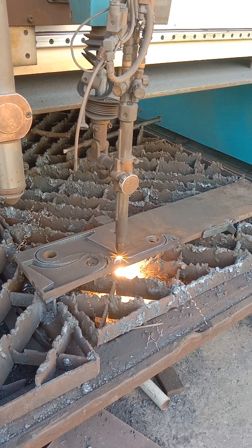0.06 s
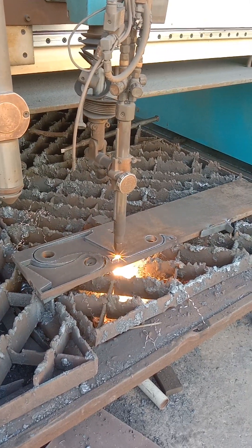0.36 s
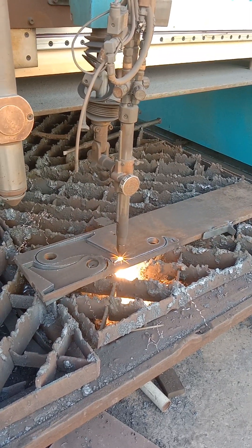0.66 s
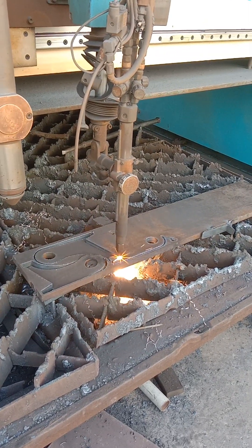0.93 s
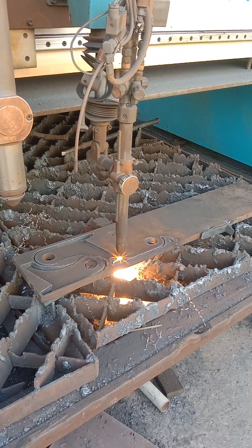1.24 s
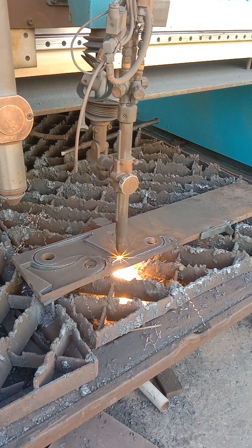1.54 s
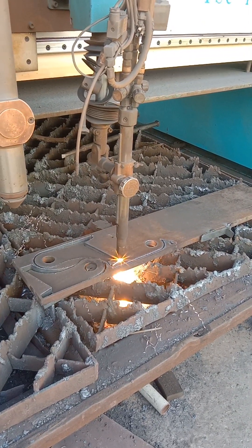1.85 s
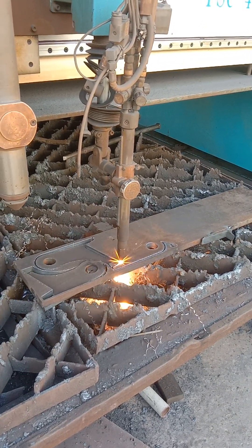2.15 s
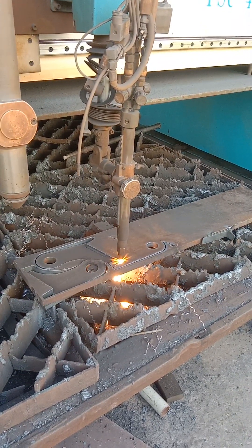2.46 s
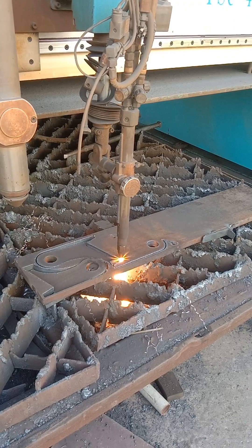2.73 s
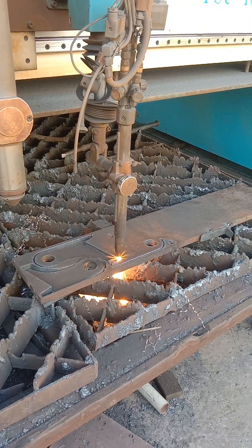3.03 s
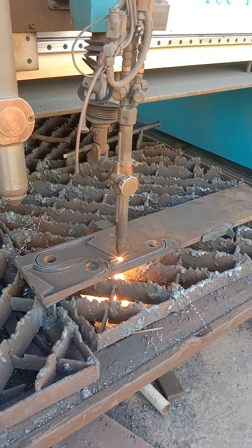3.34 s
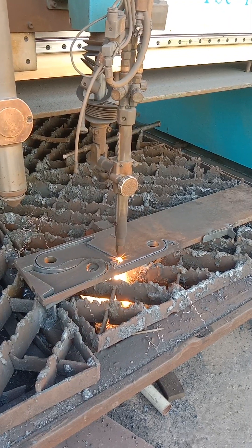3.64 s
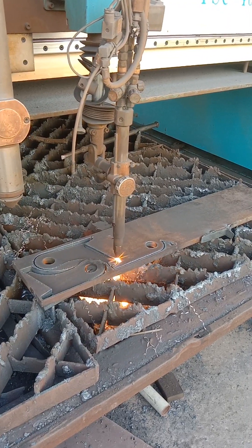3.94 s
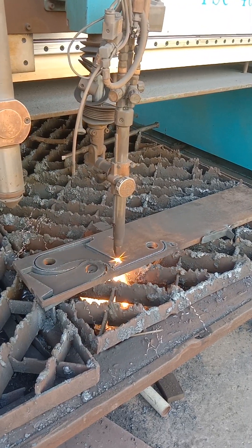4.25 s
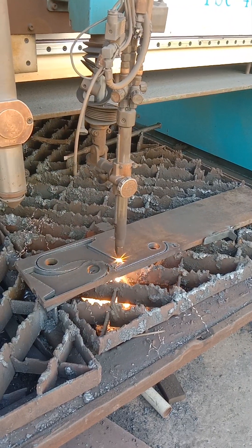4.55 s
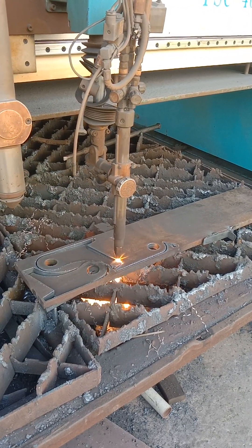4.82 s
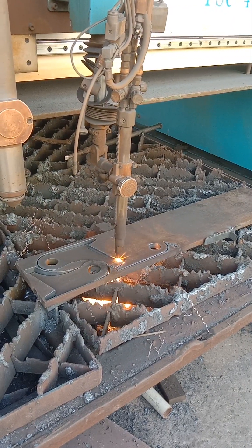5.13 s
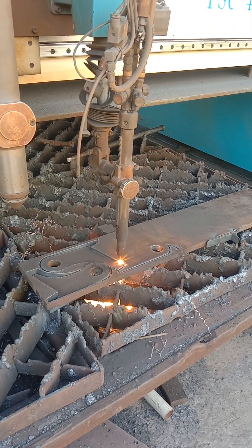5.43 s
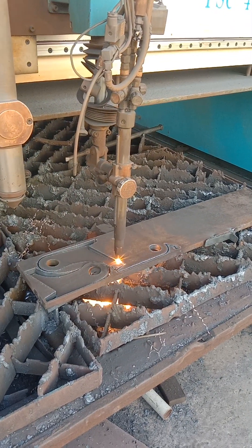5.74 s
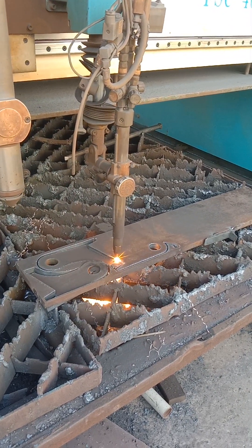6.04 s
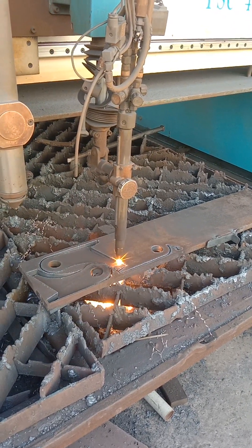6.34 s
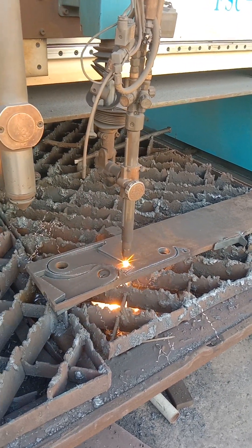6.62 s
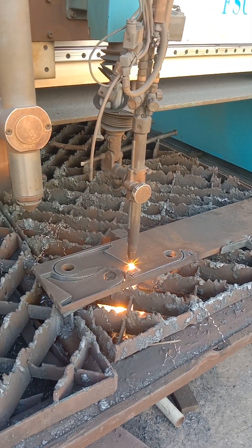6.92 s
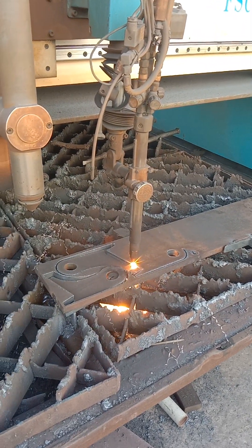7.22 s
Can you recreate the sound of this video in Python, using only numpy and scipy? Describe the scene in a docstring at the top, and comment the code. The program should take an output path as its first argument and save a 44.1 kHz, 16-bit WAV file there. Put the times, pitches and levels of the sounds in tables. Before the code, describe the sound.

A gas cutting torch burns through thick steel plate in a fabrication shop, heard close up and running without a break for about seven seconds. From the start there is a bright, high hiss over an even rush of flames and a rough, finely crackling roar with a breathy whistle. The hiss surges briefly around 2.2 and 2.5 seconds, and the cut rings hollow from about 2.4 to 3.2 seconds. From about 2.9 seconds, molten slag spits in small irregular pops, thickest until 5.5 seconds and scattered afterwards. The whistle shifts in tone near 3 seconds, and a few soft, low puffs of flame come between 3.4 and 4.3 seconds. In the second half the hiss and roar ease slightly while a rapid sputtering flutter grows, with short hiss surges near 6.5 and 7 seconds. A faint gas rumble and a low machine drone lie underneath.

```python
"""An oxy-fuel torch on a cutting machine burns through thick steel plate, heard close by in mono.
Its turbulent oxygen jet hisses at the nozzle, roars in the kerf (the slot being cut) and excites its
resonances, fluttering more and more as slag blocks it and is blown clear in popping gobs.
The preheat flames rush evenly, burning gas rumbles under the plate, and the machine drones.
Standing waves and short echoes of the slatted steel table colour the torch."""
import sys
import numpy as np
from scipy import signal
from scipy.fft import rfft, irfft
from scipy.io import wavfile
from scipy.ndimage import uniform_filter1d

SR = 44100
rng = np.random.default_rng(int(sys.argv[2]) if len(sys.argv) > 2 else 0)


def generate_wav(signal):
    """Clip the signal to [-1, 1] and save it as 16-bit WAV at the path in sys.argv[1]."""
    frames = np.transpose(np.atleast_2d(signal))
    scaled = np.clip(frames, -1, 1) * 32767
    pcm = np.round(scaled).astype(np.int16)
    wavfile.write(sys.argv[1], SR, pcm)


N = 321048
TIME = np.arange(N) / SR
FREQ = np.maximum(np.fft.rfftfreq(N, 1 / SR), .1)

# gobs of slag blown clear, with the relative peaks of their rings: start_s, low_db, middle_db, high_db
SLAG_GOBS = [(2.87, -25, -27.5, -30.5), (2.899, -28, -31.5, -30.5), (3.069, -21, -29.5, -17),
             (3.126, -20.5, -20, -30.0), (3.31, -23, -31.5, -26.5), (3.3715, -23, -33.0, -31.5),
             (3.4348, -22, -31.0, -26.5), (3.6613, -24, -29.5, -25.0), (3.6893, -32, -34.5, -18),
             (3.7781, -30, -35.0, -29.0), (3.8983, -32, -36, -28.0), (3.9576, -26, -30.5, -24),
             (3.99, -34, -28, -23), (4.0894, -23, -34.0, -20), (4.1203, -29, -32, -17),
             (4.2635, -27, -26, -33.5), (4.476, -38, -28.0, -31.0), (4.5129, -32, -29.5, -32),
             (4.5448, -38, -31.5, -20), (4.6007, -26.5, -29.0, -33.5), (4.6496, -25, -36.5, -26),
             (4.772, -33.0, -36.0, -28.5), (4.807, -35.0, -32, -29.0), (4.8935, -36.0, -24, -31),
             (5.0222, -33, -23, -34.0), (5.053, -28, -27, -23), (5.0906, -35.5, -34.5, -25),
             (5.132, -34.0, -35.0, -30.0), (5.1945, -28.5, -32.0, -32.0), (5.35, -31, -26.5, -29.5),
             (5.402, -29, -29.5, -26), (5.4296, -36.0, -32.0, -29.5), (5.7511, -29.5, -32.5, -29.5),
             (6.058, -32, -22, -37.0), (6.1891, -38.0, -30.5, -36.5), (6.617, -40.0, -26.5, -27.5),
             (6.665, -34, -24, -29), (6.7152, -33, -36.0, -35.5), (6.828, -32.0, -30, -25),
             (7.093, -29.5, -28, -31.0), (7.1564, -33.0, -19, -32.5)]


def oxygen_hiss(flutter, early_db=-22.5, late_db=-26.5, waver_db=1.0, shift_db=2.7):
    """Turbulent mixing at the nozzle makes a bright hiss that softens in the corner and surges at times."""
    # spectrum of the free jet: frequency_hz, level_db
    jet_spectrum = [(100, -35), (2000, -10), (4500, -1), (7200, 4.5), (8400, 1), (11500, 0), (14000, 1),
                    (15300, 4.5)]
    # surges of the hiss: start_s, length_s, boost_db
    hiss_surges = [(2.16, 0.19, 3), (2.47, 0.14, 4.5), (4.5, 1.2, 0.4), (6.4, 0.35, 3), (7.02, 0.12, 4.5)]
    # bands that waver independently, shifting the colour: centre_hz
    band_centres = [2000, 6000, 7800, 8800, 9800, 10800, 12000, 13500, 15300]
    level_db = early_db + (late_db - early_db) * step(middle_s=3.5, width_s=0.98)
    level_db = level_db + spells(hiss_surges, attack_s=0.043, release_s=0.041) + waver_db * walk(22)
    spectrum = rfft(colour(rng.standard_normal(N), jet_spectrum))
    shares = np.eye(len(band_centres))
    bands = (irfft(spectrum * np.interp(FREQ, band_centres, share), N) for share in shares)
    shifting = sum(band * undb(shift_db * walk(2.1)) for band in bands)
    return shifting * undb(level_db) * flutter ** 0.065


def jet_levels():
    """Roar and whistle levels in dB: both follow the jet's effort and dip as melt throttles the flow."""
    # how hard the jet works in the kerf: time_s, roar_db, whistle_db
    jet_effort = [(0.1, -22.5, -18), (.5, -23, -20.5), (.97, -22.5, -19), (1.25, -22.5, -21),
                  (1.95, -24.5, -21.5), (2.55, -22.5, -20.5), (2.8, -23.5, -21), (3.45, -23.5, -22),
                  (3.7, -23, -22), (4.1, -27, -23.5), (4.7, -25.5, -26.5), (5.15, -25, -24),
                  (5.9, -27.5, -28), (6.3, -25.5, -26.5), (6.7, -29.5, -27), (7.1, -30, -24.5),
                  (7.28, -26.5, -29)]
    # the melt chokes the kerf: start_s, length_s, depth_db
    melt_chokes = [(2.77, .022, 4), (3.03, .028, 4), (3.342, 0.028, 3), (3.79, 0.022, 3), (4.78, .022, 4),
                   (6.018, 0.026, 6), (6.46, 0.041, 5), (6.565, 0.036, 4)]
    choke_db = spells(melt_chokes, attack_s=0.0039, release_s=.005)
    return [level_db - choke_db for level_db in curves(jet_effort)]


def slag_flutter(clean_db=1.12, clogged_db=4, jitter=0.1166, uneven=.25, lean=0.33, sharp=0.17):
    """Relaxation oscillation: the jet's gain falls as melt gathers and leaps as it bursts through."""
    # the jet clears the slag, labouring in the corner and stalling briefly later: time_s, rate_hz
    clearing_rates = [(0, 41), (2, 48), (3, 30), (3.5, 42), (3.9, 35), (4.3, 42), (4.5, 30), (4.8, 45),
                      (5.03, 54), (5.4, 36), (5.9, 52), (6.03, 17), (6.4, 59), (6.6, 40), (7.28, 52)]
    # the cut runs cleaner and flutters less: start_s, length_s, swing_drop_db
    clean_spells = [(4.17, .27, .9), (6.22, 0.23, 1.5)]
    rate_hz, = curves(clearing_rates)
    swing_db = clean_db + (clogged_db - clean_db) * step(middle_s=3.9, width_s=1.3)
    swing_db = swing_db - spells(clean_spells, attack_s=.025, release_s=.025)
    phase = 2 * np.pi * np.cumsum(rate_hz * np.exp(jitter * walk(27.5))) / SR
    # each gob leaves on a burst of the jet
    burst_s = np.transpose(SLAG_GOBS)[0] + 0.0042
    phase_at_bursts = np.unwrap(np.interp(burst_s, TIME, phase))
    phase = phase - np.interp(TIME, burst_s, phase_at_bursts)
    # bursts are shorter than the lulls, and rise faster than they fall
    cycle = np.cos(phase) + sharp * np.cos(2 * phase) - lean * np.sin(2 * phase)
    gain = undb(swing_db * cycle * (1 + uneven * np.tanh(walk(30))) + 0.57 * walk(24))
    return gain / np.sqrt(uniform_filter1d(gain ** 2, size=8192))  # steady mean power


def kerf_roar(level_db, flutter, crackle_db=-9):
    """Turbulence and bursting droplets radiate broadband noise as the jet tears through the melt."""
    # spectrum of the roar: frequency_hz, level_db
    roar_spectrum = [(60, -51), (300, -24), (700, -25.5), (1100, -1), (1600, -2), (2400, 1), (3300, 1.5),
                     (3900, -1), (5400, -5), (7200, -6), (8200, -13.5), (14000, -45)]
    jet = unit(rng.standard_normal(N) + undb(crackle_db) * pops(per_second=1300, spread_db=22))
    return colour(jet, roar_spectrum) * undb(level_db + 0.72 * walk(16)) * flutter


def kerf_whistle(level_db, flutter, early_db=-1.5, late_db=-3.5):
    """Edge tones: the jet sings on the kerf's edges, whose resonances change as the cut rounds a corner."""
    # resonances before the corner: pitch_hz, width_hz, level_db
    early_modes = [(4770, 270, 1), (5370, 250, 0.5), (5350, 430, -5), (6250, 370, 1.5), (6700, 1400, -4)]
    # resonances after the corner: pitch_hz, width_hz, level_db
    late_modes = [(2310, 300, -2.5), (3310, 600, -4.5), (3800, 180, 0), (4560, 260, 1), (5070, 190, -2.5),
                  (5430, 350, 7.5), (6310, 490, 3.5)]
    turned = step(middle_s=3.2, width_s=0.44)
    early = resonate(early_modes, waver_db=1.77, waver_rate=5.3) * np.sqrt(1 - turned) * undb(early_db)
    late = resonate(late_modes, waver_db=2.5, waver_rate=70) * np.sqrt(turned) * undb(late_db)
    return (early + late) * undb(level_db) * flutter ** 0.77


def kerf_hollow(flutter, low_db=-43, middle_db=-49, upper_db=-45, high_db=-42):
    """Pipe resonance: the slot rings hollow in spells, most on entering the corner."""
    # the slot's notes drift as its shape changes: time_s, low_hz, middle_hz, high_hz
    slot_notes = [(0, 3220, 4680, 7240), (.9, 3350, 4770, 7280), (2.45, 3430, 4680, 7280),
                  (2.9, 3360, 4580, 7310), (3.4, 3390, 4550, 7280), (4.6, 3332, 4630, 7110),
                  (6.5, 3230, 4570, 7170), (7.28, 3194, 4500, 7000)]
    # boosts of its four rings: start_s, length_s, low_db, middle_db, upper_db, high_db
    hollow_spells = [(-.2, .5, 8.5, 8, 4, 4), (.58, .6, 4, 19, 3, 8), (2.36, 0.25, 13.5, 19, 0, 14),
                     (2.61, 0.53, 14.5, 22.5, 4, 11), (3.15, 0.42, 11, 0, 6, 5), (4.72, 0.21, 0, 19, 0, -2),
                     (4.95, 0.23, 8, 7, 6, 8), (6.29, 0.37, 8, 0, 0, 9.5), (6.6, .6, 3.5, -2, 8.5, -3)]
    low_hz, middle_hz, high_hz = curves(slot_notes)
    boost_db = [spells(hollow_spells, attack_s=0.043, release_s=0.064, column=k) for k in range(4)]
    low = ring(low_hz, width_hz=113) * undb(low_db + boost_db[0])
    middle = ring(middle_hz, width_hz=310) * undb(middle_db + boost_db[1])
    upper = ring(5300, width_hz=180) * undb(upper_db + boost_db[2])
    high = ring(high_hz, width_hz=270) * undb(high_db + boost_db[3])
    return (low + middle + upper) * flutter ** 1.16 + high * flutter ** .9


def preheat_flames(start_db=-25.0, swell_db=2):
    """Combustion noise: the ring of flames gives a slowly growing rush with a thin sizzle on top."""
    # spectrum of the flames: frequency_hz, level_db
    flame_spectrum = [(40, -28), (150, -17.5), (280, 0.5), (370, 1.5), (450, -7), (690, -2.5), (1000, 5.5),
                      (1500, 0.5), (2200, -13.5), (4000, -12.5), (7100, -5), (8200, -25), (12000, -16),
                      (14000, -7.5), (15300, -1.5)]
    rush = colour(rng.standard_normal(N), flame_spectrum)
    return rush * undb(start_db + swell_db * TIME / TIME[-1] + .5 * walk(25))


def slag_spits(gain_db=-2.0, body_db=-2):
    """Transient excitation: each gob blown clear gives a hollow pop with its own mix of resonances."""
    # body, low, middle and high ring of a pop: pitch_hz, width_hz
    gob_modes = [(1500, 430), (2270, 360), (3300, 480), (5300, 490)]
    body, low, middle, high = (ring(hz, width_hz) for hz, width_hz in gob_modes)
    rings = [low + undb(body_db) * body, middle, high]
    spits = sum(sound * bursts(SLAG_GOBS, rise_s=.004, column=k) for k, sound in enumerate(rings))
    return spits * undb(gain_db)


def exhaust(rumble_db=-36, waver_db=2.5):
    """Unsteady combustion under the plate rumbles, dies down in lulls and billows in deep puffs."""
    # spectrum of the burning gas: frequency_hz, level_db
    rumble_spectrum = [(20, -45), (50, -16.5), (85, -8.5), (130, 4.5), (160, -4), (210, -12.5), (300, -14),
                       (500, -13.5), (1200, -39)]
    # the rumble dies down: start_s, length_s, depth_db
    rumble_lulls = [(-0.1, 0.31, 10), (.28, 0.25, 13.5), (.93, 0.54, 3.5), (1.91, 0.3, 10),
                    (2.29, 0.94, 17.5), (3.66, 0.27, 9), (4.38, 0.24, 3.5), (5.5, 0.32, 1.5),
                    (6.12, .05, 16), (6.23, 0.054, 14)]
    # the flame billows: start_s, peak_db
    flame_puffs = [(3.435, -32), (3.58, -45), (3.96, -45), (4.13, -35), (4.3, -37)]
    puff_modes = [(84.4, 14, -1.8), (123, 25, 0)]  # pitch_hz, width_hz, level_db
    level_db = rumble_db - spells(rumble_lulls, attack_s=0.022, release_s=0.047) + waver_db * walk(11)
    rumble = colour(rng.standard_normal(N), rumble_spectrum) * undb(level_db)
    puffs = resonate(puff_modes, waver_db=0) * bursts(flame_puffs, rise_s=0.021)
    return rumble + puffs


def cutting_table(torch, sway=0.015, drift=.008):
    """Interference: standing waves and short echoes colour the torch, drifting as the microphone sways."""
    # standing waves between plate, slats and gantry: pitch_hz, width_hz, boost_db
    standing_waves = [(304, 19, 2.5), (561, 58, 2.5), (1106, 56, 1.5), (1374, 10, 6), (1438, 39, -12.5),
                      (1492, 21, 4), (1680, 36, 3.5), (1837, 40, 8.5), (1978, 37, 6), (2160, 24, 5),
                      (2330, 19, 3.5), (2400, 55, -0.5), (2504, 26, -26), (2957, 28, -26), (3520, 106, -6),
                      (4060, 110, -8), (4900, 58, -4), (7770, 190, -2), (9200, 90, 1), (9600, 200, 2),
                      (10700, 300, 1.5), (11200, 220, 0)]
    # reflections from nearby steel: delay_s, gain
    steel_echoes = [(.00105, -0.11), (.00127, .1), (.00159, -0.16), (.0038, 0.14), (.0076, -0.096)]

    def coloured(shift):
        """The torch filtered by the standing waves, their pitches scaled by shift."""
        boost_db = sum(db * np.exp(-2 * ((FREQ - hz * shift) / width_hz) ** 2)
                       for hz, width_hz, db in standing_waves)
        return irfft(rfft(torch) * undb(boost_db), N)

    blend = .5 + .5 * np.tanh(2 * walk(2.0))
    direct = blend * coloured(1 + drift) + (1 - blend) * coloured(1 - drift)
    reflected = sum(gain * np.interp(TIME - delay_s * (1 + sway * walk(0.79)), TIME, direct)
                    for delay_s, gain in steel_echoes)
    return direct + reflected


def machine(drone_db=-42):
    """Narrowband vibration: the cutting machine drones on a few unsteady low notes."""
    # notes of the drone: pitch_hz, width_hz, level_db
    drone_modes = [(189, 6, 0), (316, 6, -1), (383, 14, -7)]
    return resonate(drone_modes, waver_db=2.5, waver_rate=13) * undb(drone_db)


def resonate(modes, waver_db, waver_rate=14):
    """Random forcing: each resonance is driven by its own noise and wavers in strength; rms 1."""
    total = 0
    for hz, width_hz, db in modes:
        response = 1 / (1 + .5j * (FREQ ** 2 - hz ** 2) / (FREQ * width_hz * np.sqrt(2))) ** 2
        mode = unit(irfft(rfft(rng.standard_normal(N)) * response, N))
        total = total + mode * undb(db + waver_db * walk(waver_rate))
    return unit(total)


def ring(hz, width_hz):
    """Narrowband noise of a resonance stirred by turbulence, whose centre may glide; rms 1."""
    phase = 2 * np.pi * np.cumsum(hz + np.zeros(N)) / SR
    return unit(walk(width_hz) * np.cos(phase) + walk(width_hz) * np.sin(phase))


def pops(per_second, spread_db):
    """A Poisson train of clicks, many small and a few large; rms 1."""
    chance, size, sign = rng.random(N), rng.random(N), rng.choice([-1, 1], N)
    return unit((chance < per_second / SR) * sign * undb(spread_db * size ** 3))


def colour(x, points):
    """Spectral shaping by a curve through (frequency_hz, level_db) points; rms 1."""
    hz, db = np.transpose(points)
    gain = undb(np.interp(np.log(FREQ), np.log(hz), db))
    return unit(irfft(rfft(x) * gain, N))


def walk(rate):
    """Low-pass noise that changes about rate times a second; rms 1."""
    return unit(irfft(rfft(rng.standard_normal(N)) * np.exp(-(FREQ / rate) ** 2), N))


def bursts(events, rise_s, column=0):
    """Critically damped envelopes of (start_s, peak_db, ..) events; column picks among the peaks."""
    envelope = np.zeros(N)
    for start_s, *db in events:
        near = slice(*np.searchsorted(TIME, [start_s, start_s + 10 * rise_s]))
        age = (TIME[near] - start_s) / rise_s
        envelope[near] += undb(db[column]) * age * np.exp(1 - age)
    return envelope


def spells(events, attack_s, release_s, column=0):
    """Sum of (start_s, length_s, level_db, ..) events that rise, hold and fall; column picks the level."""
    return sum(db[column] * step(start_s, attack_s) * (1 - step(start_s + length_s, release_s))
               for start_s, length_s, *db in events)


def step(middle_s, width_s):
    """A smooth transition from 0 to 1 around a moment."""
    return .5 + .5 * np.tanh((TIME - middle_s) / width_s)


def curves(table):
    """Each column of a timed table, interpolated sample by sample."""
    time_s, *columns = np.transpose(table)
    return [np.interp(TIME, time_s, column) for column in columns]


def undb(db):
    """Decibels to amplitude gain."""
    return 10 ** (np.asarray(db) / 20)


def unit(x):
    """Scale to rms 1."""
    return x / np.sqrt(np.mean(x ** 2))


def scene():
    """Superposition of the torch, coloured by its table, and the machine; the same in both channels."""
    roar_db, whistle_db = jet_levels()
    flutter = slag_flutter()
    kerf = kerf_roar(roar_db, flutter) + kerf_whistle(whistle_db, flutter) + kerf_hollow(flutter)
    torch = preheat_flames() + oxygen_hiss(flutter) + kerf + slag_spits() + exhaust()
    return np.tile(cutting_table(torch) + machine(), (2, 1))


def record(dry):
    """Band limiting: an elliptic low-pass cuts the highest treble steeply."""
    cutoff_hz = 15500
    return signal.sosfilt(signal.ellip(12, .1, 80, cutoff_hz, fs=SR, output="sos"), dry)


dry = scene()
out = record(dry)
generate_wav(out)
```